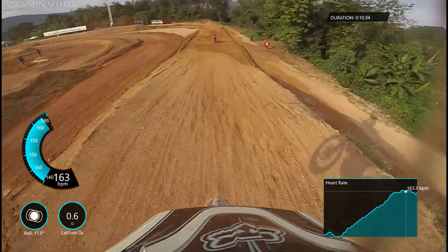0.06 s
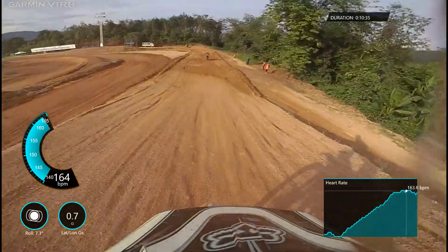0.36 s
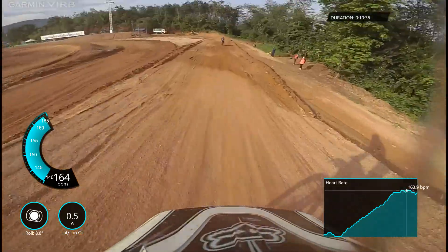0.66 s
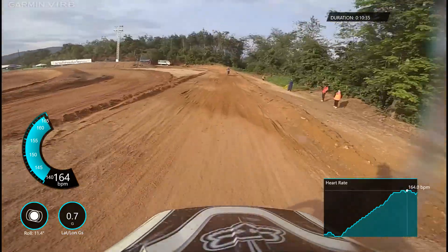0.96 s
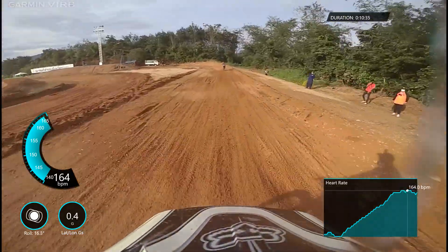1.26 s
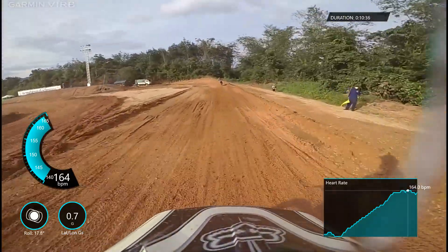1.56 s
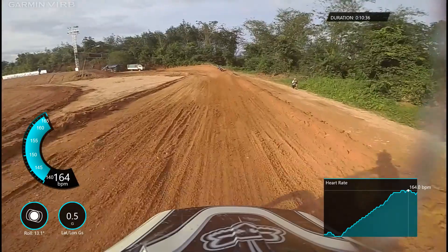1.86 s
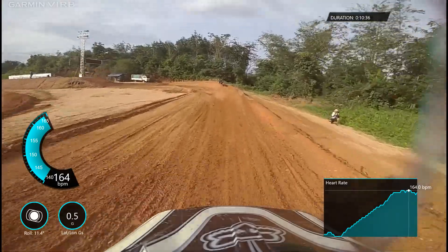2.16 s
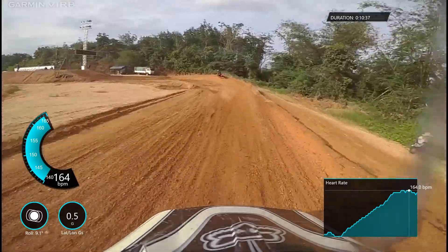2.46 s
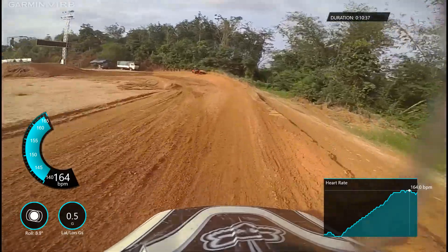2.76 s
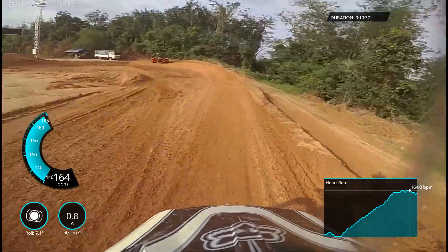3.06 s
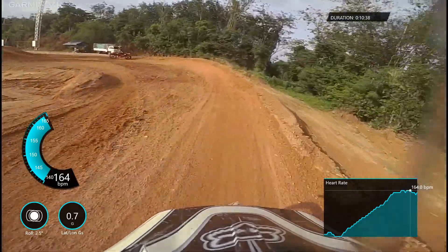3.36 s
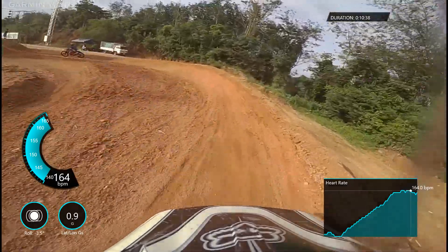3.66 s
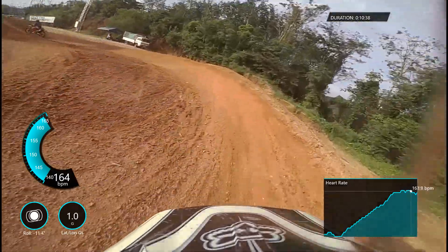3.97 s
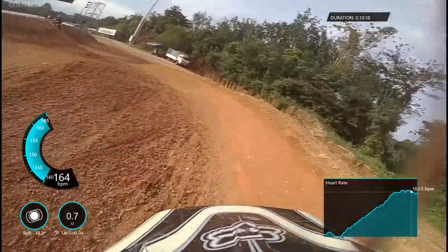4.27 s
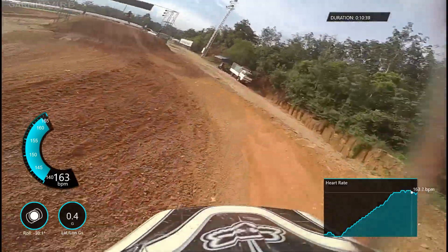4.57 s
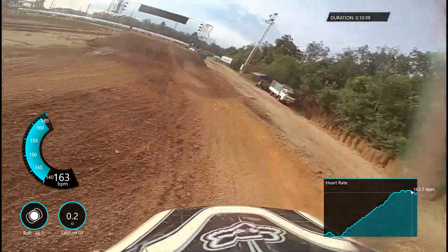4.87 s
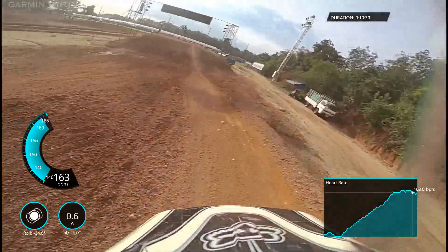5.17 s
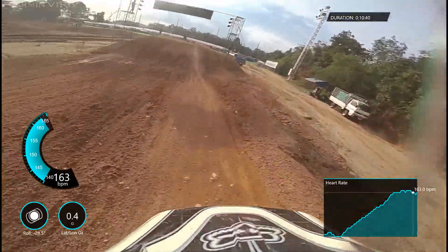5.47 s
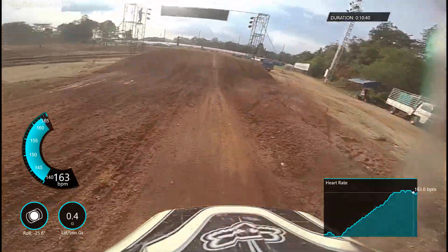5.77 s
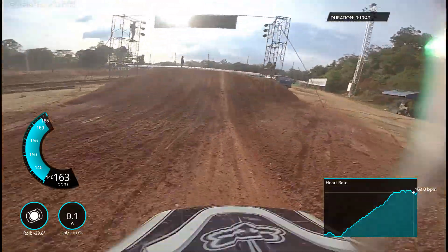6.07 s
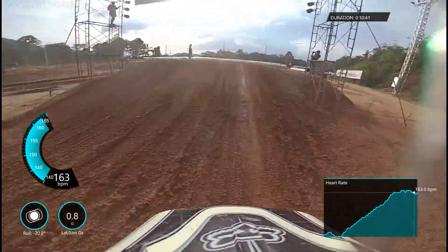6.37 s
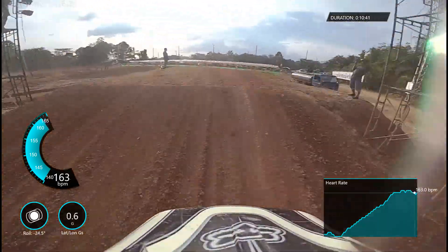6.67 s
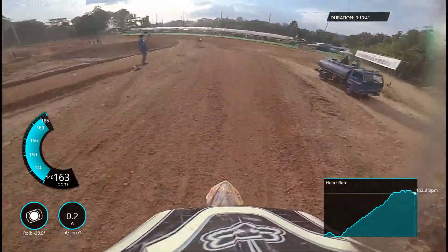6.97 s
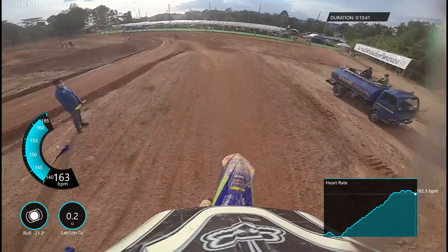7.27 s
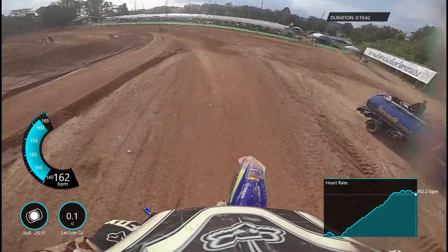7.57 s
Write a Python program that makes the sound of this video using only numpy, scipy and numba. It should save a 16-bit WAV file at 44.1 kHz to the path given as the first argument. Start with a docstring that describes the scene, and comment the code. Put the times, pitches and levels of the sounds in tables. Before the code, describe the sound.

A four-stroke dirt bike revs, coasts into a bend, then accelerates hard, heard from the rider's helmet with wind buffeting.

```python
"""A four-stroke dirt bike heard from the rider's helmet: a burst of throttle, a long coast into a
bend, then a hard pull up a jump. Firings boom in the airbox and bark from the pipe; the valve train
clatters. A loose part rattles at low revs, the chain whirs, the frame thuds on an early landing and
the brake squeals once. Wind rumbles and thumps on the microphone, whose housing rings in the treble."""
import sys
import numpy as np
from scipy import signal
from scipy.fft import rfft, irfft
from scipy.io import wavfile
from scipy.ndimage import uniform_filter1d
from numba import njit

SR = 44100
rng = np.random.default_rng(int(sys.argv[2]) if len(sys.argv) > 2 else 0)


def wav_out(sig):
    """Save sig, one row per channel (or a flat mono array), as 16-bit PCM at SR to the path in sys.argv[1]."""
    wavfile.write(sys.argv[1], SR, np.round(np.clip(np.atleast_2d(sig).T, -1, 1) * 32767).astype(np.int16))


N = 335865
T = np.arange(N) / SR
CRUISE_HZ = 60  # firing rate


def engine(firing_hz, firing_at_s=5.0115):
    """One firing every two crank turns drives airbox and pipe; the idle turn adds a push or a suck."""
    throttle, idle_turn, boom_db, bark_db, rasp_db = rider()
    cycles = np.cumsum(firing_hz) / SR
    cycles -= np.interp(firing_at_s, T, cycles)
    idle_pulses = idle_turn * pulses(cycles + .5, scatter_db=.9, jitter_s=.00005)
    power_pulses = pulses(cycles, scatter_db=1.2, jitter_s=.0001)
    firing = (power_pulses + idle_pulses) / np.sqrt(1 + idle_turn ** 2)
    return (airbox(firing, firing_hz, throttle) * undb(boom_db)
            + exhaust(firing, firing_hz, cycles, throttle, idle_turn, bark_db, rasp_db)
            + silencer(firing, firing_hz, throttle)
            + clatter(cycles, throttle))


# Engine speed: time_s, firing_hz
REVS = [(0, 40.34), (.1, 49.73), (.16, 53.24), (.21, 56.35), (.26, 53.74), (.33, 67.67), (.4, 66.57),
        (.5, 74.5), (.55, 74.47), (.64, 67.3), (.71, 67.54), (.85, 72), (.91, 65.6), (.98, 62.9),
        (1.07, 67.9), (1.29, 64.1), (1.53, 62.34), (1.95, 58.58), (2.35, 55.85), (2.85, 54.18),
        (3.1, 50.62), (3.31, 49.08), (3.58, 44.4), (3.69, 38.58), (3.81, 36.77), (3.96, 38.65),
        (4.03, 43.48), (4.075, 38.9), (4.12, 42.52), (4.16, 39.36), (4.33, 38.59), (4.42, 41.14),
        (4.62, 31.75), (4.93, 33.03), (5.06, 49.48), (5.23, 40.23), (5.32, 43.5), (5.39, 38.47),
        (5.47, 42.5), (5.6, 42.74), (5.73, 53.1), (5.81, 51.12), (5.9, 58.44), (5.97, 62.56), (6.14, 58.94),
        (6.2, 63.9), (6.27, 63.73), (6.33, 70.64), (6.57, 72.56), (6.67, 70.36), (6.73, 73.6), (6.78, 71.6),
        (6.87, 73.3), (6.92, 78.5), (6.98, 73), (7.04, 72.82), (7.11, 66.8), (7.17, 67.05), (7.27, 61.1),
        (7.38, 58.44), (7.42, 55.2), (7.62, 52.06)]

def revs(ramp_s=6.455, slip_half_s=.17, slip_hz=7.9):
    """Firing rate, wavering over bumps and shaken as the rear wheel slips and grips on the ramp."""
    hz, = curves(REVS)
    slip = .045 * bell(ramp_s, slip_half_s) * np.cos(2 * np.pi * slip_hz * (T - ramp_s))
    bumps = .004 * (hz / CRUISE_HZ) ** 2 * walk(22)
    return hz * (1 + slip + bumps)


# Throttle twists; a nested one is an extra push: start_s, end_s, opening, idle_turn (-1 suck, 1 push),
# added_boom_db, added_bark_db, added_rasp_db, snarl_order, snarl_db, howl_db
TWISTS = [(-.02, 0.283, .83, 1, -1.5, -4, 12.5, 6.3, -31, -53),
          (0.086, 0.217, 0, 0.17, -1.5, 6, -0.5, 8, -30, -36),
          (0.209, .275, 0, 0.17, -5, -1, 5.5, 10.6, -39, -58),
          (.35, .48, 0.04, .05, -0.5, 4, 2, 8, -42, -57), (0.485, 0.55, .5, .27, -8, 9.5, 2, 8, -47, -54),
          (0.536, 0.661, 0.52, -.11, 5.5, -4, 11, 8, -38, -56),
          (0.689, 0.831, .5, .28, -2.5, 0.5, 11, 9, -43, -60),
          (0.906, 1.426, 0.12, .1, 3, -10, 2, 9, -56, -68),
          (3.617, 4.197, 0, -.22, -7.5, 5.5, 10, 14, -50, -58),
          (4.321, 4.473, 0.35, 0.9, -8, 1.5, 14.5, 14, -45, -56),
          (4.633, 4.863, 0.29, .015, 2.5, 4.5, 4.5, 14, -53, -58),
          (4.953, 5.529, 0.66, 0.054, 4, 4.5, -4.5, 13, -40, -56),
          (5.185, 5.257, 0.13, .1, -0.5, 1.5, -3, 13, -43, -47.5),
          (5.524, 5.589, 0.5, 0.12, -5, 2, -1, 13, -34, -60.5),
          (5.581, 6.008, 0.74, -0.41, 7.5, 0, 12, 12, -38.5, -50.5),
          (5.611, 5.714, 0, 0.23, 2, 1, 0.5, 12, -31.5, -47),
          (5.881, 5.986, 0.06, 0, -1.5, -2, 1.5, 13, -37.5, -42),
          (6.012, 6.32, 0.99, -0.29, 0, 1, 6.5, 12.5, -38, -46.5),
          (6.305, 6.911, 1, -0.26, -3, -3.5, 5.5, 10.6, -37.5, -50.5),
          (6.92, 7.029, 0.29, -0.37, -4, 6.5, 11, 13, -43, -53),
          (7.031, 7.513, 0.4, -0.1, 0.5, 0.5, 7.5, 8, -42.5, -53)]
TWIST_RAMP_S = .045

def rider(shut_opening=.013, shut_idle_turn=.038, gulp_db=4, gulp_s=.22):
    """Each twist opens, holds and shuts the throttle; the airbox booms harder just after opening."""
    throttle, idle_turn = np.full(N, shut_opening), shut_idle_turn
    boom_db = bark_db = rasp_db = 0
    for start_s, end_s, opening, push, added_boom_db, added_bark_db, added_rasp_db, *_ in TWISTS:
        grip = held(start_s, end_s, TWIST_RAMP_S)
        was_shut = 1 - np.interp(start_s, T, throttle)
        gulp = was_shut ** 2 * np.exp(-np.abs(T - start_s) / gulp_s)
        throttle += grip * (opening - shut_opening)
        idle_turn += grip * (push - shut_idle_turn)
        boom_db += grip * (added_boom_db + gulp_db * gulp)
        bark_db += grip * added_bark_db
        rasp_db += grip * added_rasp_db
    return np.clip(throttle, 0, 1), idle_turn, boom_db, bark_db, rasp_db


def snarl_and_howl(gas, firing_hz, howl_order=24):
    """The valve stays open for a fixed crank angle, so two pipe resonances climb with the revs."""
    voice = np.array([[TWISTS[0][7]], [0], [0]])  # first snarl order, both gains zero
    for start_s, end_s, *_, order, snarl_db, howl_db in TWISTS:
        target = np.array([[order], [undb(snarl_db)], [undb(howl_db)]])
        voice = voice + held(start_s, end_s, TWIST_RAMP_S) * (target - voice)
    snarl_order, snarl_gain, howl_gain = voice
    snarl = sing(gas, snarl_order * firing_hz, width_hz=167)
    howl = sing(gas, np.clip(howl_order * firing_hz, 1165, 1436), width_hz=290)
    return snarl_gain * snarl + howl_gain * howl


# Airbox response, throttle open and shut: frequency_hz, gain_db
AIRBOX_OPEN = [(40, -35), (100, -25), (160, -19.5), (195, 11), (218, 9.5), (265, -1), (315, 9), (365, -5),
               (440, -14), (520, -31.5), (600, -47), (1200, -71)]
AIRBOX_SHUT = [(40, -26), (75, -18.5), (120, -10), (180, -5.5), (225, 0), (260, -0.5), (310, -0.5),
               (350, -15), (420, -41), (600, -48.5), (1200, -64.5)]
# Boom swells as the bike pitches over bumps: centre_s, half_length_s, change_db
SWELLS = [(.575, 0.031, 3), (.68, 0.023, -4.5), (.77, 0.04, 6), (.96, 0.047, -1), (1.29, .07, 1.5),
          (1.39, 0.017, -1.5), (1.52, 0.029, -1), (1.755, 0.025, -5), (1.82, 0.034, 5), (2.06, 0.068, 3),
          (2.2, 0.024, 3.5), (2.31, .04, -4.5), (2.55, .04, 4.5), (2.72, 0.018, 1), (3.05, .03, 5),
          (3.1, 0.019, -7)]

def airbox(firing, firing_hz, throttle, overrun_order=4.44, overrun_width_hz=141.):
    """Firings boom: lower with the throttle open, round a multiple of the firing rate with it shut."""
    opened = undb(-3) * colour(firing * np.sqrt(throttle), AIRBOX_OPEN)
    shut = undb(-2.5) * colour(firing * np.sqrt(1 - throttle), AIRBOX_SHUT)
    boom = (opened + shut) / np.sqrt(1 + 6.9 * np.sqrt(throttle * (1 - throttle)))
    overrun_hz = np.clip(overrun_order * firing_hz, 230, 330)
    overrun = resonance(resonance(boom, overrun_hz, overrun_width_hz), overrun_hz, overrun_width_hz)
    boom = (.5 + .52 * throttle) * boom + undb(-6.5) * (1 - throttle) * overrun
    swell_db = sum(db * bell(centre_s, half_s) for centre_s, half_s, db in SWELLS)
    return boom * undb(swell_db) * rev_gain(firing_hz, cruise_db=-17.5, per_octave_db=3)


# Exhaust responses: frequency_hz, gain_db
BARK = [(150, -40.5), (330, -24.5), (440, 11.5), (550, 11.5), (690, 12.5), (900, -8), (1080, -22.5),
        (1400, -24), (1750, -31.5), (2300, -39.5), (3400, -42), (5000, -66)]
RASP = [(250, -25), (410, 5.5), (540, -1), (700, 5.5), (900, 11.5), (1080, -4), (1300, 2.5), (1500, -8),
        (1800, -14), (2300, -27), (4000, -48.5)]

def exhaust(firing, firing_hz, cycles, throttle, idle_turn, bark_db, rasp_db):
    """The pipe barks and rasps, firing cleanly under load and sputtering off it."""
    blast = pipe(spread(firing, echoes_s=(.0009, .0017)), firing_hz)
    turbulence = 1 - idle_turn ** 2
    sputter = .5 * valve_train(cycles, range_db=9) + .55 * noise()
    chuff = .46 * throttle * turbulence * puffs(firing, decay_s=.009)
    outflow = ground_echo((.55 + .3 * throttle) * blast + chuff + .85 * (1 - throttle) ** 2 * sputter)
    uneven_burn = undb(2.9 * walk(32))
    bark = undb(-3.5) * colour(outflow * uneven_burn, BARK)
    gas = (blast + .6 * turbulence * noise()) * uneven_burn
    ticks = .45 * (1 - np.abs(idle_turn)) * valve_train(cycles, range_db=9)
    rasp = undb(rasp_db - 16) * colour(.75 * blast + ticks + .38 * turbulence * noise(), RASP)
    load_db = 18 * np.sqrt(throttle) + bark_db
    gain = undb(load_db) * rev_gain(firing_hz, cruise_db=-49.5, per_octave_db=-1.5)
    return gain * (bark + rasp) + snarl_and_howl(gas, firing_hz)


def pipe(x, firing_hz, cruise_trip_hz=96.77, heat_power=.39, reflection=-.27):
    """Waves return inverted from the open end, sooner as the gas heats above cruising revs."""
    round_trip_s = 1 / (cruise_trip_hz * np.maximum(firing_hz / CRUISE_HZ, 1) ** heat_power)
    return unit(sum(reflection ** k * np.interp(T - k * round_trip_s, T, x) for k in range(4)))


def ground_echo(x, delay_s=.00681, share=.48):
    """Add the echo off the dirt, shifting as the bike rides up and down."""
    return x + share * np.interp(T - delay_s * (1 + .092 * walk(5)), T, x)


# Silencer response: frequency_hz, gain_db
SILENCER = [(300, -31.5), (520, -19), (590, 15), (660, -9.5), (800, -16), (900, -18.5), (985, -5.5),
            (1080, -22), (1280, -13), (1600, -34)]

def silencer(firing, firing_hz, throttle):
    """Off the throttle the silencer hums on its narrow resonances."""
    gain = (1 - throttle) * rev_gain(firing_hz, cruise_db=-50.5, per_octave_db=18.5)
    return gain * colour(firing, SILENCER)


# Valve train response: frequency_hz, gain_db
CLATTER = [(400, -21), (800, 9), (1200, 5), (1700, 0), (2100, 1), (2700, -3), (3100, -0.5), (3800, -7.5),
           (4400, -13.5), (5800, -22), (7200, -47), (8000, -36), (8900, -21), (10500, -54)]

def clatter(cycles, throttle, shut_db=-48.5, open_change_db=-1):
    """Metal ticks, and a hiss that swells on every crank turn."""
    hiss = noise() * (1 + .24 * np.cos(2 * np.pi * 2 * cycles)) * undb(2.4 * walk(45))
    ticks = valve_train(cycles, range_db=7)
    return undb(shut_db + open_change_db * throttle) * colour(.72 * ticks + .58 * hiss, CLATTER)


def valve_train(cycles, range_db, count=14):
    """Valves, gears and chain tick at fixed crank angles, repeating every cycle."""
    return unit(sum(undb(range_db * size) * pulses(cycles + phase, scatter_db=2, jitter_s=.00003)
                    for phase, size in rng.uniform(size=(count, 2))))


# Loose part: time_s, level_db, ring_hz, panel_db, upper_ring_db
RATTLE = [(.015, -32, 1553, -27, -18), (.07, -75, 1570, -8, -14.5), (2.7, -66.5, 1704, -5, -3.5),
          (2.97, -39, 1640, 1.5, -4.5), (3.05, -38.5, 1534, 9, -8), (3.11, -42, 1556, -1, -27),
          (3.165, -35.5, 1460, 1, -18), (3.23, -41, 1435, 1, -18), (3.37, -34, 1624, 0, -29),
          (3.43, -36.5, 1433, 5, -32), (3.48, -34.5, 1612, 6.5, -26), (3.535, -32, 1626, 0, -28),
          (3.64, -37, 1614, 9.5, -23), (3.72, -32, 1600, 10, -7), (3.9, -39.5, 1695, 11, -10),
          (3.99, -37.5, 1770, 11, -22), (4.15, -36, 1740, 15, -14), (4.42, -42, 1387, 16, -15),
          (4.6, -69.5, 1410, -3, -20)]
# Free bouncing: time_s, knock_rate_hz
BOUNCE = [(2.8, 57.77), (2.87, 60.87), (2.96, 86.06), (3.02, 80.08), (3.11, 63.92), (3.17, 67.02),
          (3.31, 66.1), (3.38, 82.72), (3.44, 78.96), (3.48, 73.75), (3.53, 86.6)]
# Knock response: frequency_hz, gain_db
KNOCK = [(500, -3), (1000, -4), (1300, 1.5), (1620, -0.5), (2000, -5), (2400, -4.5), (2900, -15.5),
         (3500, -10.5), (4200, -23.5), (6000, -24.5), (7300, -56), (8900, -22), (10500, -83.5)]

def rattle(firing_hz, lock_hz=45.74, knock_at_s=3.718, upper_ring_hz=2450.):
    """A loose part rings on its stop and thuds a panel: once a crank turn at low revs, else freely."""
    level_db, ring_hz, panel_db, upper_db = curves(RATTLE)
    free_hz = curves(BOUNCE)[0] * (1 + .03 * walk(30))
    cycles = np.cumsum(np.where(firing_hz < lock_hz, 2 * firing_hz, free_hz)) / SR
    knocks = pulses(cycles - np.interp(knock_at_s, T, cycles), scatter_db=.8, jitter_s=.00004)
    scrape = puffs(knocks, decay_s=.0038)
    fizz = noise() * undb(3 * walk(600))
    crack = colour(.15 * spread(knocks, echoes_s=(.0004, .0009)) + .75 * scrape + .6 * fizz, KNOCK)
    strike = .9 * knocks + .3 * scrape
    ring = undb(-1.5) * sing(strike, ring_hz, width_hz=480)
    upper_ring = undb(upper_db) * sing(strike, np.full(N, upper_ring_hz), width_hz=510)
    panel = [(60, -16.5), (155, 6.5), (230, -15), (310, 2), (380, 7), (450, -10.5), (700, -14),
             (1500, -54)]  # frequency_hz, gain_db
    thud = undb(panel_db) * colour(knocks, panel)
    return undb(level_db) * (undb(-6) * crack + ring + upper_ring + thud)


# Slack spells: centre_s, half_length_s, level_db
WHIRS = [(0.193, 0.089, -43.5), (0.544, 0.068, -39.5), (1.107, 0.99, -53), (4.352, 0.099, -44),
         (5.414, 0.07, -47), (7.075, 0.15, -47), (7.396, 0.2, -45.5)]
# Chain response: frequency_hz, gain_db
CHAIN = [(400, -24), (800, 6), (1200, 4.5), (1800, 0), (2700, -3), (3250, 3), (3800, -6), (4400, -12),
         (5800, -24.5), (7200, -52), (8900, -26), (10500, -55)]

def chain():
    """The slack drive chain whirs over its guides, swelling and fading."""
    gain = sum(undb(db) * bell(centre_s, half_s) for centre_s, half_s, db in WHIRS)
    links = noise() * undb(.49 * walk(300))
    return gain * colour(links, CHAIN)


# Frame response: frequency_hz, gain_db
FRAME = [(50, -12.5), (110, 4), (170, -5.5), (260, -6.5), (500, -27.5), (1500, -44)]

def landing(start_s=.552, level_db=-19.5, decay_s=.07):
    """Frame and suspension thud as the bike comes down."""
    age_s = np.maximum(T - start_s, 0)
    return undb(level_db) * colour(noise() * (age_s > 0) * np.exp(-age_s / decay_s), FRAME)


def brake(start_s=4.655, end_s=4.745, ramp_s=.012, pitch_hz=939, level_db=-35.5):
    """The disc squeals briefly in the bend, wavering in pitch."""
    gate = np.clip(np.minimum(T - start_s, end_s - T) / ramp_s, 0, 1)
    hz = pitch_hz * (1 + .01 * walk(150))
    return undb(level_db) * gate * np.sin(2 * np.pi * np.cumsum(hz) / SR)


def gears(firing_hz, meshes_per_firing=42, level_db=-59):
    """Off the throttle the gear teeth whine faintly, following the revs."""
    throttle = rider()[0]
    whine = sing(noise(), meshes_per_firing * firing_hz, width_hz=280)
    return undb(level_db) * (1 - throttle) ** 2 * whine


# Wind strength: time_s, rumble_db, gust_db
WIND = [(0, -17, -29), (.14, -23.5, -44), (.33, -18, -26), (.8, -23, -32.5), (1.3, -19.5, -41.5),
        (2.3, -23.5, -34), (3.55, -19, -40.5), (4.2, -22.5, -24.5), (4.7, -20, -23), (5.1, -27.5, -24.5),
        (5.5, -21, -29), (5.8, -38, -42), (6.08, -22.5, -21), (6.3, -32, -40), (6.8, -32.5, -40),
        (6.98, -21, -36.5), (7.62, -18.5, -38)]
# Wind spectra: frequency_hz, gain_db
RUMBLE = [(25, -20.5), (50, -8), (77, 2), (100, -4.5), (135, -8.5), (190, -8), (280, -10), (380, -21),
          (600, -32.5), (1200, -44.5)]
GUSTS = [(8, -1.5), (18, 3.5), (30, -6.5), (45, -1.5), (70, -17), (150, -40.5)]

def wind(flutter_db=1.5, gust_swing_db=3.5):
    """Turbulence round the helmet: a fluttering rumble over slow gusts."""
    rumble_db, gust_db = curves(WIND)
    rumble = colour(noise(), RUMBLE) * undb(rumble_db - 2 + flutter_db * walk(25))
    gusts = colour(noise(), GUSTS) * undb(gust_db + gust_swing_db * walk(9.2))
    return rumble + gusts


# Wind thumps: centre_s, peak_db, half_length_s, dip_depth_db, dip_hold_s
THUMPS = [(0.27, -12, 0.0045, 8.5, 0.063), (0.327, -14, 0.0038, 11.5, 0.0063),
          (0.403, -11.5, 0.0062, 3, 0.14), (1.371, -20, 0.0022, 2.5, 0.087), (1.704, -11, 0.0021, 2, 0.028),
          (1.992, -7.5, .0015, -4, .02), (2.114, -6, 0.0013, 0.5, 0.095), (3.074, -13.5, 0.0045, 3.5, 0.03),
          (3.204, -14.5, 0.0021, 3, 0.027), (4.185, -18, 0.012, 10.5, 0.099),
          (4.517, -15.5, 0.0096, 14.5, 0.064), (4.861, -11.5, 0.013, 14, 0.084),
          (5.061, -18, 0.0076, 6.5, 0.042), (5.307, -15, 0.011, 7, 0.037), (5.434, -13.5, 0.01, 10, 0.012),
          (5.52, -7, 0.0056, 11.5, 0.047), (5.988, -11, 0.0025, 12.5, 0.02),
          (6.155, -11, 0.0022, 7.5, 0.0069)]

def thumps(rebound_stretch=1.4, attack_s=.0061, release_s=.028):
    """Slaps of air, each a suck and a slower rebound, and the gain of the brief dips behind them."""
    slaps, dip_db = np.zeros(N), np.zeros(N)
    for centre_s, peak_db, half_s, depth_db, hold_s in THUMPS:
        age_s = T - centre_s
        late = np.maximum(age_s, 0) / (rebound_stretch * half_s)
        rebound = .87 * late * np.exp(-late ** 2 / 2)
        slaps += undb(peak_db) * (rebound - bell(centre_s, half_s))
        release = np.exp(-np.maximum(age_s - hold_s, 0) / release_s)
        dip_db += depth_db * np.clip(age_s / attack_s, 0, 1) * release
    return slaps, undb(-dip_db)


# Stone strikes: start_s, peak_db, ring_hz
GRIT = [(3.647, -45, 9520), (3.719, -49, 8020), (5.991, -53.5, 7700)]

def grit(decay_s=.00204):
    """Small stones tick on the helmet."""
    ticks = np.zeros(N)
    for start_s, peak_db, ring_hz in GRIT:
        envelope = (T >= start_s) * np.exp(-np.abs(T - start_s) / decay_s)
        ticks += undb(peak_db) * envelope * np.sin(2 * np.pi * ring_hz * T + walk(2200))
    return ticks


def undb(db):
    """Decibels to gain."""
    return 10 ** (np.asarray(db) / 20)


def unit(x):
    """Scale to rms 1."""
    return x / np.sqrt(np.mean(x ** 2))


def rev_gain(firing_hz, cruise_db, per_octave_db):
    """Gain that follows the revs."""
    return undb(cruise_db + per_octave_db * np.log2(firing_hz / CRUISE_HZ))


def curves(table):
    """Table columns interpolated to every sample."""
    time_s, *columns = np.transpose(table)
    return [np.interp(T, time_s, column) for column in columns]


def bell(centre_s, half_s):
    """Gaussian envelope, peak 1."""
    return np.exp(-((T - centre_s) / half_s) ** 2)


def held(start_s, end_s, ramp_s):
    """Gate with ramps centred on its ends."""
    return np.clip((T - start_s) / ramp_s + .5, 0, 1) - np.clip((T - end_s) / ramp_s + .5, 0, 1)


def noise():
    """White noise."""
    return rng.standard_normal(N)


def walk(rate_hz):
    """Smooth random drift, rms 1."""
    step = max(int(SR / rate_hz), 1)
    return unit(uniform_filter1d(noise()[np.arange(N) // step], step))


def pulses(cycles, scatter_db, jitter_s):
    """One click per cycle, uneven in size and timing; rms 1."""
    at = np.flatnonzero(np.diff(np.floor(cycles)) > 0)
    size_error, time_error = rng.standard_normal((N // 100, 2))[:len(at)].T
    jittered = np.clip(at + (jitter_s * SR * time_error).astype(int), 0, N - 1)
    clicks = np.zeros(N)
    clicks[jittered] = undb(scatter_db * size_error) * np.sqrt(np.gradient(at))
    return unit(clicks)


def puffs(clicks, decay_s):
    """A noise burst after each click; rms 1."""
    return unit(signal.lfilter([1], [1, -np.exp(-1 / (decay_s * SR))], clicks) * noise())


def spread(x, echoes_s):
    """All-pass echoes smear each pulse over a few milliseconds."""
    for delay_s in echoes_s:
        feedback = np.zeros(int(delay_s * SR) + 1)
        feedback[0], feedback[-1] = 1, .5
        x = signal.lfilter(feedback[::-1], feedback, x)
    return x


def colour(x, response, size=16384):
    """Ring x through a minimum-phase body of unit energy, given as (frequency_hz, gain_db) points."""
    hz, db = np.transpose(response)
    bin_hz = np.maximum(np.arange(size // 2 + 1) * SR / size, 1)
    rolloff = np.maximum(bin_hz / hz[-1], 1) ** 2 * np.maximum(hz[0] / bin_hz, 1)
    magnitude = undb(np.interp(np.log(bin_hz), np.log(hz), db)) / rolloff
    cepstrum = irfft(np.log(magnitude))
    cepstrum[1:size // 2] *= 2
    cepstrum[size // 2 + 1:] = 0
    ring = irfft(np.exp(rfft(cepstrum)))
    return signal.fftconvolve(x, ring / np.linalg.norm(ring))[:N]


@njit
def resonance(x, hz, width_hz):
    """State-variable band-pass with a moving centre."""
    y, band, low = np.empty(len(x)), 0., 0.
    for i in range(len(x)):
        g, damping = np.tan(np.pi * hz[i] / SR), width_hz / hz[i]
        v = (band + g * (x[i] + 1e-18 - low)) / (1 + g * (g + damping))
        band, low = 2 * v - band, low + 2 * g * v
        y[i] = damping * v
    return y


def sing(x, hz, width_hz):
    """Two moving band-passes in series; rms 1."""
    return unit(resonance(resonance(x, hz, float(width_hz)), hz, float(width_hz)))


def scene(throb_db=1.43):
    """Bike and wind at the helmet; the bike's level throbs over rough ground."""
    slaps, dip = thumps()
    firing_hz = revs()
    bike = engine(firing_hz) + rattle(firing_hz) + chain() + gears(firing_hz) + landing()
    bike = bike * undb(throb_db * walk(12)) + brake()
    return ((bike + wind()) * dip + slaps + grit())[None]


def record(dry, housing_hz=3460, width_hz=243, ring_db=4.5, cutoff_hz=10800):
    """The microphone housing rings, peaks are rounded and the top is cut."""
    ring = signal.lfilter(*signal.iirpeak(housing_hz, housing_hz / width_hz, fs=SR), dry)
    rounded = np.tanh(.71 * (dry + undb(ring_db) * ring)) / .49
    return signal.sosfilt(signal.ellip(8, .2, 70, cutoff_hz, fs=SR, output="sos"), rounded)


dry = scene()
out = record(dry)
wav_out(out)
```